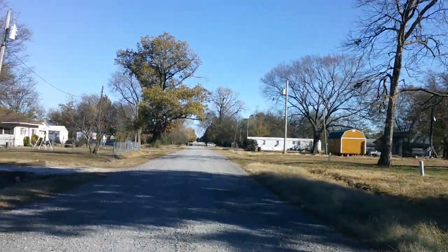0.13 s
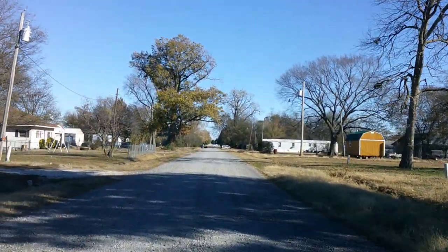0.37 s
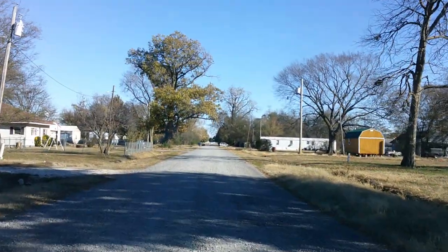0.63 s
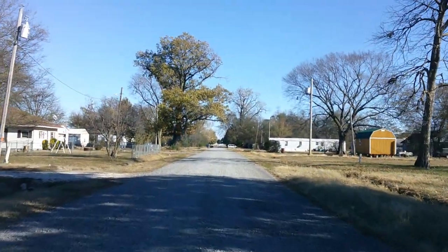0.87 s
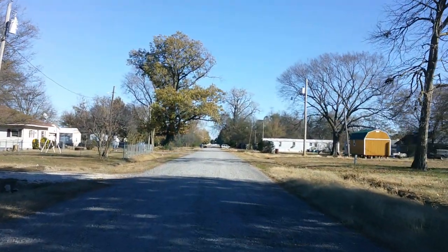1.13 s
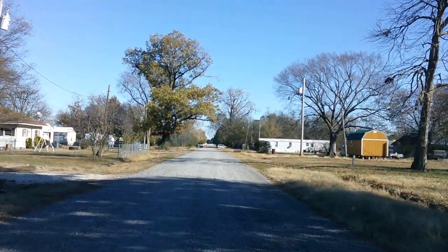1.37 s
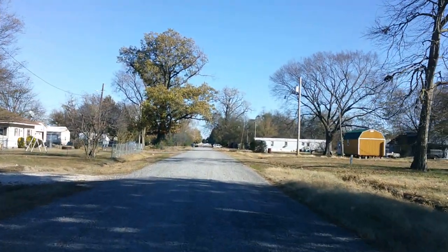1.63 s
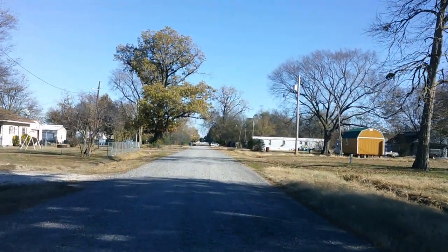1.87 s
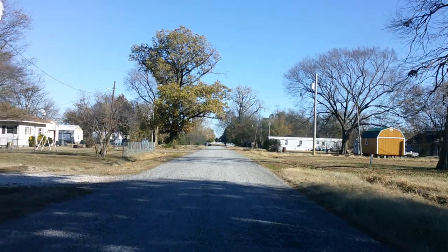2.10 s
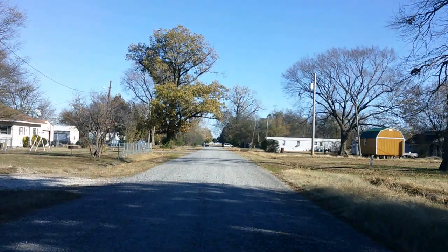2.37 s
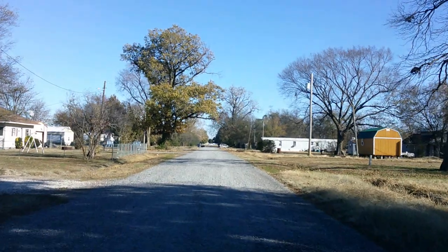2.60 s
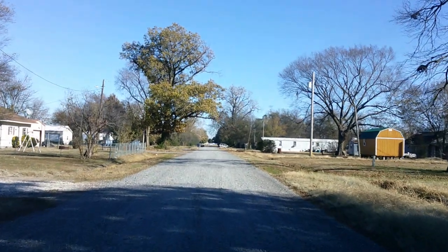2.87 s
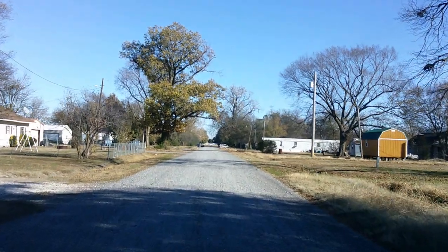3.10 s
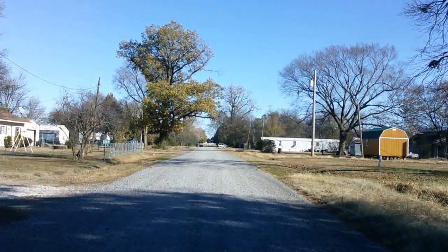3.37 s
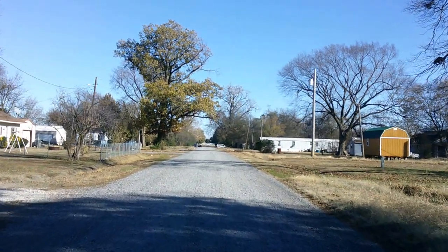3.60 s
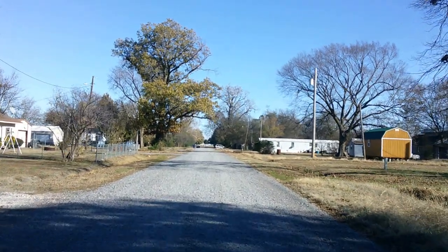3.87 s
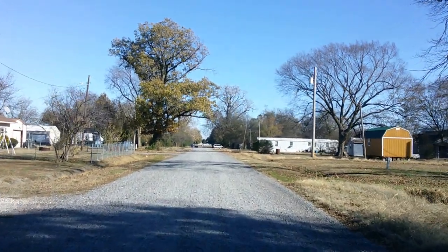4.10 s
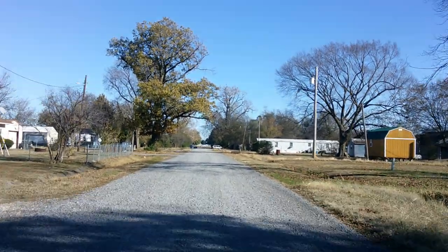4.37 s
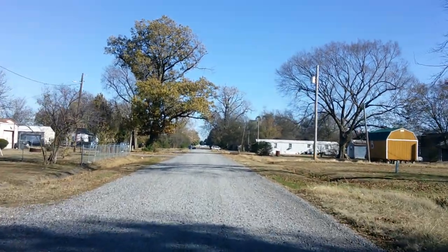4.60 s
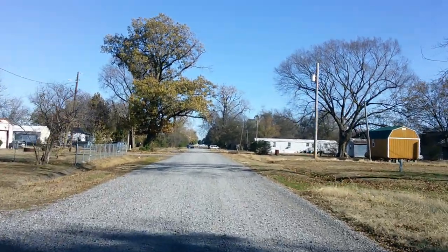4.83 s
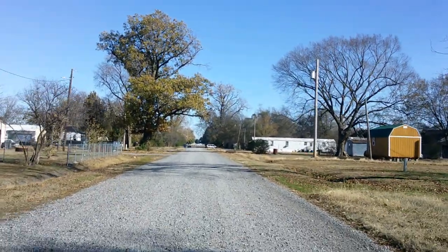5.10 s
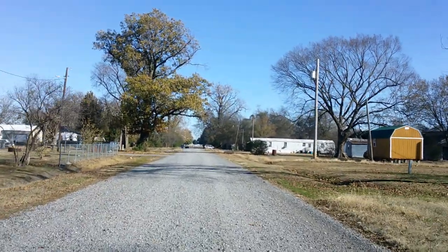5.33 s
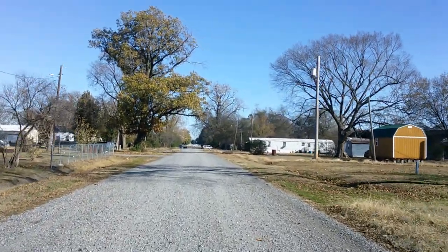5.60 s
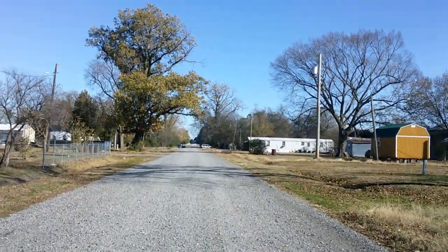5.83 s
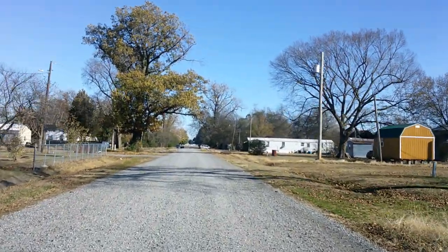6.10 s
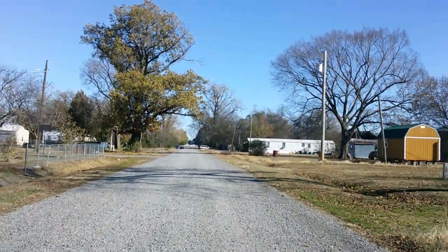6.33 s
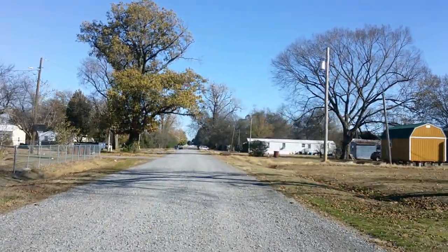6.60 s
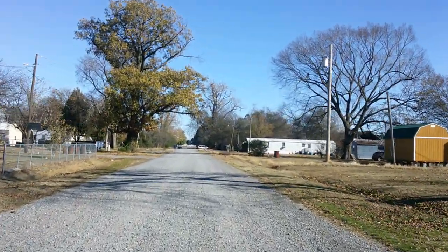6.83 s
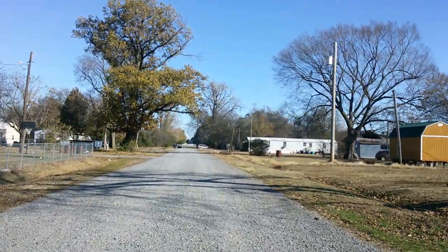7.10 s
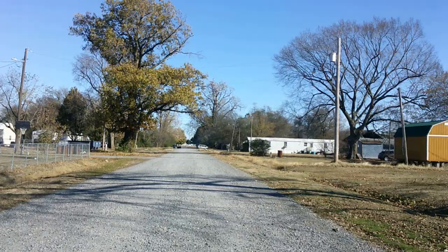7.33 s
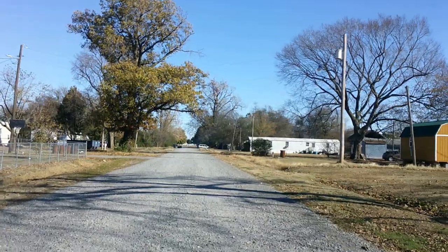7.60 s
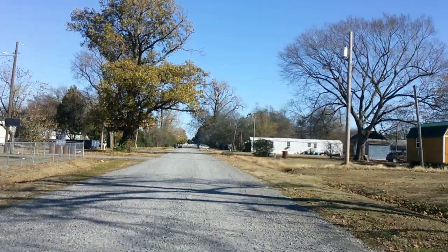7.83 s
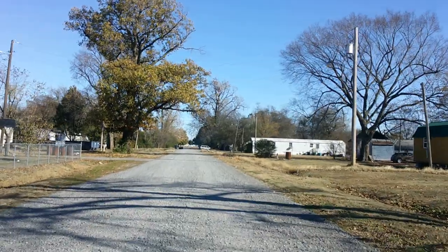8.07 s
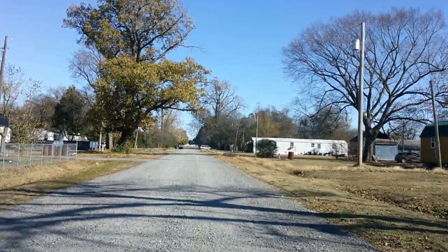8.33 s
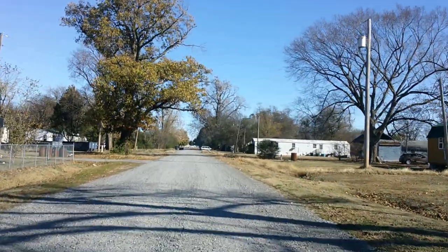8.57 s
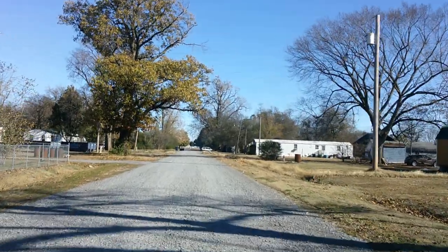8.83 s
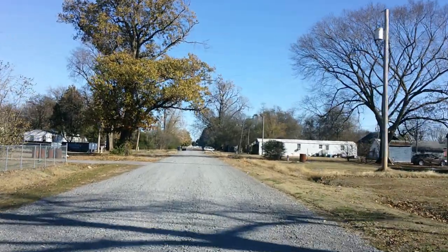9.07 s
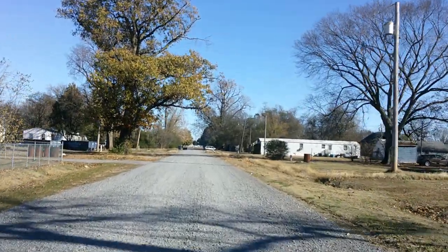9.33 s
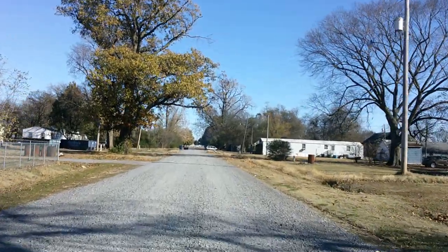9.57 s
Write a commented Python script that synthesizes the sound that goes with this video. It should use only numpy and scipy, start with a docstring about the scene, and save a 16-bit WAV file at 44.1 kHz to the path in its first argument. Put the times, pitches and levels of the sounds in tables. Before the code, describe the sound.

Car tyres roll slowly over gravel, heard close and enclosed from within the cabin by a small, bright-sounding microphone. Early cracks and pings of stones on sheet metal give way to a quiet roll, then another flurry of ticks. Low drumming swells with the speed, large stones thump the floor pan ever more often, grit sprays the wheel arches, and the sound ends abruptly near nine seconds.

```python
"""Inside a car that rolls, slowly gaining speed, along a gravel road, heard by a small camera microphone.
Random impacts through filters make the tyre roar, the crunch of grit and the drumming of the cabin;
filtered noise adds the body shake. Noise bursts through resonances make stones tick and grit spray on
the sheet metal; decaying sines make pings and the thuds of larger stones on the floor pan.
The microphone port rings in the treble; the sound is cut off near the end."""
import sys
import numpy as np
from scipy import signal
from scipy.io import wavfile

SR = 44100
rng = np.random.default_rng(int(sys.argv[2]) if len(sys.argv) > 2 else 0)


def wrap_up_sound(samples):
    """Save the sound to the file named by the first command line argument, as 16-bit audio."""
    columns = np.atleast_2d(samples).T
    # keep every value between -1 and 1, then stretch to whole-number steps
    tamed = np.clip(columns, -1, 1)
    steps = np.round(tamed * 32767).astype(np.int16)
    wavfile.write(sys.argv[1], SR, steps)


def gain_from_decibels(decibels):
    """Convert decibel values to linear amplitude factors."""
    exponent = np.asarray(decibels, float) / 20
    return 10 ** exponent


N = 427769
TIME_S = np.arange(N) / SR
CUT_S = 9.0365  # the sound has stopped here


def evened(x):
    """Scales to rms 1."""
    return x / np.sqrt(np.mean(x ** 2) + 1e-20)


def curve(points, at_s=TIME_S):
    """Level in dB, in straight lines between (start_s, level_db) points."""
    return np.interp(at_s, *np.transpose(points))


def colour(x, points):
    """Minimum-phase filter with the gain of the (pitch_hz, level_db) points."""
    hz, db = np.transpose(points)
    full_hz = abs(np.fft.fftfreq(16384, 1 / SR))
    gain_db = np.interp(np.log(full_hz + 1), np.log(hz + 1), db)
    log_gain = np.log(gain_from_decibels(np.maximum(gain_db, -100)))
    # the Hilbert transform gives the phase that makes the filter causal
    taps = np.fft.ifft(np.exp(np.conj(signal.hilbert(log_gain)))).real[:6000]
    return signal.oaconvolve(x, taps)[:len(x)]


def resonate(x, modes, order=1):
    """Sum of resonances; a higher order repeats each section for steeper flanks."""
    out = np.zeros(len(x))
    for hz, width_hz, db in modes:
        section = signal.tf2sos(*signal.iirpeak(hz, hz / width_hz, SR))
        out += gain_from_decibels(db) * signal.sosfilt(np.repeat(section, order, axis=0), x)
    return out


def stones(per_s, spread_db, bed):
    """Random impacts, most small and a few large, over a bed of countless tiny ones."""
    size = gain_from_decibels(spread_db * np.minimum(rng.exponential(1, N), 5))
    size = size * rng.choice([-1., 1.], N)
    hits = rng.random(N) < per_s / SR
    return evened(size * hits) + bed * rng.standard_normal(N)


def lumps(per_s, depth_db):
    """Gain that wanders as the stones come in clumps."""
    knots_s = np.arange(0, N / SR + 1, 1 / per_s)
    return gain_from_decibels(depth_db * np.interp(TIME_S, knots_s, rng.standard_normal(len(knots_s))))


# drumming that grows with speed and swells over rough patches: start_s, level_db
ROUGHNESS = [(0.0, -42.5), (0.5, -44), (1.12, -43.5), (1.36, -39), (1.6, -43), (2.56, -42.5), (2.78, -47),
             (3.0, -41.5), (4.25, -39), (4.48, -33.5), (4.7, -36.5), (5.6, -35), (6.07, -35.5),
             (6.58, -30.5), (6.95, -37.5), (7.4, -32.5), (7.68, -34.5), (7.88, -30.5), (8.13, -35),
             (8.7, -34.5), (8.87, -29.5), (8.95, -34)]


def drumming_db(at_s=TIME_S):
    """Level of the drumming, which sets how hard the road works the car."""
    return curve(ROUGHNESS, at_s)


def following_db(calm_level_db, db_per_db):
    """Level of a layer that follows the drumming up from the slow start."""
    calm_drumming_db = -44
    return calm_level_db + db_per_db * (drumming_db() - calm_drumming_db)


# spectrum of the body shake: pitch_hz, level_db
SHAKE_SPECTRUM = [(15, -31.5), (32, -17.5), (46, -3), (60, -3), (80, 0), (110, -18.5), (200, -86)]


def body_shake():
    """Deep noise of the shaking body, wandering slowly and growing with the drumming."""
    shake = colour(rng.standard_normal(N), SHAKE_SPECTRUM)
    shake = evened(shake * lumps(per_s=2.5, depth_db=0.5))
    return gain_from_decibels(following_db(calm_level_db=-58, db_per_db=0.63)) * shake


# spectrum of the tread hiss with the port resonance in it: pitch_hz, level_db (relative, per Hz)
HISS_SPECTRUM = [(2240, -32.5), (3800, -10.5), (4600, -18), (5140, -13), (5700, -7), (6560, -1.5),
                 (6940, 1), (7840, -8), (8810, -24.5), (11500, -57.5), (19400, -120)]
# level of the tread hiss: start_s, level_db
HISS_LEVEL = [(0, -72), (.22, -76), (.7, -75.5), (1.0, -72), (1.2, -76), (1.68, -73.5), (1.95, -74),
              (2.15, -78), (2.36, -78), (2.6, -74), (3.2, -72), (4.3, -72), (4.55, -74.5), (5.3, -71),
              (6.0, -76), (6.25, -75.5), (6.4, -71), (6.55, -73), (6.63, -70), (6.75, -74.5), (7.44, -72),
              (7.65, -75), (7.98, -70.5), (8.36, -75), (8.84, -73)]


def tread_hiss():
    """Fine grit under the tread: lumpy impacts filtered to the bright band of the port."""
    grit = stones(per_s=120, spread_db=2.5, bed=2)
    grit = grit * lumps(per_s=43, depth_db=1.5) * lumps(per_s=12, depth_db=1.3)
    return gain_from_decibels(curve(HISS_LEVEL)) * evened(colour(grit, HISS_SPECTRUM))


# spectrum of the even tyre roar: pitch_hz, level_db (relative, per Hz)
ROAR_SPECTRUM = [(700, -58), (1100, -14.5), (1500, -5), (2200, -2.5), (3400, -10.5), (4800, -21),
                 (6500, -50), (10600, -110)]
# the roar swells, then eases back: start_s, level_db
ROAR_SWELL = [(0, -69), (.4, -71.5), (3.0, -70.5), (3.6, -65.5), (4.3, -65.5), (6.1, -68), (7.6, -67.5),
              (9.0, -69.5)]


def tyre_roar(clumps):
    """Impacts so dense that they merge into an even mid-range roar."""
    impacts = stones(per_s=430, spread_db=3, bed=2.3) * clumps
    return gain_from_decibels(curve(ROAR_SWELL)) * evened(colour(impacts, ROAR_SPECTRUM))


# spectrum of grit heard through the floor: pitch_hz, level_db (relative, per Hz)
CRUNCH_SPECTRUM = [(260, -34), (450, 0), (549, -9), (630, -11), (717, -16), (815, -12), (1250, -20.5),
                   (1710, -29.5), (2500, -37.5), (4800, -59.5), (6240, -82.5), (10600, -120)]


def grit_crunch(clumps):
    """Clumped impacts heard through the floor, growing with the drumming."""
    grit = stones(per_s=250, spread_db=3.5, bed=1.65)
    grit = grit * clumps * lumps(per_s=14, depth_db=2.5)
    crunch = evened(colour(grit, CRUNCH_SPECTRUM))
    return gain_from_decibels(following_db(calm_level_db=-54.5, db_per_db=0.65)) * crunch


# spectrum of the panel drumming: pitch_hz, level_db (relative, per Hz)
DRUM_SPECTRUM = [(20, -46.5), (38, -28.5), (60, -16), (90, -6), (150, -2), (240, -4.5), (372, -7.5),
                 (470, -13.5), (540, -22), (700, -24), (900, -32), (1200, -42.5), (2000, -100)]
# booming modes of the cabin: pitch_hz, width_hz, level_db
CABIN_MODES = [(80, 14, -1.5), (119.4, 17, 5), (160, 6.1, -6.5), (203.5, 48, 1), (629, 40, 4.5),
               (781, 27, 2.5)]


def cabin_rumble():
    """Tyres climbing stones drum the panels, and the cabin modes boom along."""
    impacts = stones(per_s=400, spread_db=3.0, bed=1.23)
    impacts = impacts * lumps(per_s=30, depth_db=1.2) * lumps(per_s=9, depth_db=1.07)
    drum = colour(impacts, DRUM_SPECTRUM)
    return gain_from_decibels(drumming_db()) * evened(drum + resonate(drum, CABIN_MODES))


def road():
    """All the continuous layers; roar and crunch share the same clumps of stones."""
    clumps = lumps(per_s=40, depth_db=1.5)
    return body_shake() + tread_hiss() + tyre_roar(clumps) + grit_crunch(clumps) + cabin_rumble()


# resonances of the microphone port: pitch_hz, width_hz (of one section), level_db (relative)
PORT_MODES = [(6793, 790, 10), (6370, 1100, -1.5), (5720, 610, -12.5), (7570, 380, -17.5)]


def through_port(x):
    """The microphone port rings in the treble, as steep doubled resonances."""
    return resonate(x, PORT_MODES, order=2)


# handfuls of grit thrown against the wheel arch:
# start_s, length_s, bright_db, dull_db (drive levels before the resonances)
GRIT_SPRAYS = [(0.648, .008, -61, -59), (1.996, .016, -59, -58), (2.387, .012, -60, -56),
               (2.486, .014, -51, -64), (2.503, 0.011, -54.5, -62), (2.582, .010, -59, -60),
               (2.817, .008, -66, -61), (3.668, 0.011, -60, -59), (6.440, 0.016, -62.5, -56),
               (6.386, .022, -69, -60), (4.564, 0.01, -68, -62), (4.667, .016, -70, -64),
               (5.779, 0.022, -66, -62), (6.163, .016, -62, -63), (6.406, .010, -52.5, -60),
               (6.429, .008, -58, -64), (6.465, .008, -50, -57), (6.512, 0.0072, -57, -62),
               (7.838, .010, -58, -58), (7.9, .022, -65, -63), (7.927, .030, -66.5, -57.5),
               (8.077, 0.013, -67, -63), (8.09, 0.012, -63, -63), (8.606, .016, -62.5, -61)]
# resonances of the wheel arch: pitch_hz, width_hz (of one section), level_db (relative)
ARCH_MODES = [(4040, 550, -1.5), (3000, 650, 1), (2100, 1200, 1.5)]


def sprays():
    """A flat burst of many grains, too dense to tell apart, through port and wheel arch."""
    rise_s, tail_t60_s = .001, .015
    t = np.arange(2000) / SR
    drive = np.zeros((2, N + len(t)))  # bright, dull
    grains = rng.standard_normal((len(GRIT_SPRAYS), 2, len(t)))
    grains = grains * rng.exponential(1, (len(GRIT_SPRAYS), 1, len(t)))
    for (start_s, length_s, *levels_db), noise in zip(GRIT_SPRAYS, grains):
        tail = gain_from_decibels(-60 * np.maximum(t - length_s, 0) / tail_t60_s)
        burst = np.clip(t / rise_s, 0, 1) * tail
        start = round(start_s * SR)
        drive[:, start:start + len(t)] += gain_from_decibels(levels_db)[:, None] * noise * burst
    bright, dull = drive[:, :N]
    return gain_from_decibels(-1.5) * through_port(bright) + gain_from_decibels(1.5) * resonate(dull, ARCH_MODES, order=2)


# stones that ring one patch of the bodywork at its own pitch:
# start_s, level_db (before rise and doubling), pitch_hz, t60_s
BODY_PINGS = [(.8740, -27, 299, .04), (.2150, -34.5, 870, .02), (.2315, -43, 1170, 0.025),
              (.3305, -40, 1150, 0.017), (.3305, -43, 2190, .015), (.6290, -44, 900, 0.023),
              (.6490, -52, 1160, 0.021), (.8720, -49, 1240, 0.026), (1.0260, -50, 1270, 0.027),
              (1.0325, -27.5, 442, 0.038), (1.9945, -46, 1640, 0.017), (2.0270, -44, 1140, 0.02),
              (2.1430, -44, 850, 0.027), (2.4440, -56, 1300, 0.018), (2.8165, -48, 1500, .015),
              (3.4640, -47, 1360, 0.032), (3.5620, -47, 1330, 0.027), (3.6660, -51, 1240, .025),
              (4.4060, -49, 1220, 0.022), (5.4240, -36, 613, 0.043), (6.0110, -46, 714, .03),
              (6.3090, -53, 750, 0.025), (6.4545, -40, 950, .02), (6.4540, -37.5, 5600, .01),
              (6.4545, -38, 3260, 0.015), (6.4805, -47.5, 3450, .012), (7.2245, -40.5, 1400, 0.024),
              (7.4250, -40, 600, 0.043), (7.7520, -38.5, 620, 0.057), (7.8395, -51.5, 3560, .02),
              (7.9320, -68, 4330, 0.097), (8.7535, -47, 840, 0.026), (8.9770, -48, 750, .03)]


def pings():
    """A short ring of two neighbouring modes, the upper one weaker."""
    rise_s, partner_ratio, partner_db = 0.002, 1.27, -10  # rise is a time constant
    t = np.arange(5000) / SR
    out = np.zeros(N + len(t))
    for start_s, level_db, hz, t60_s in BODY_PINGS:
        pair = np.sin(2 * np.pi * hz * t)
        pair += gain_from_decibels(partner_db) * np.sin(2 * np.pi * partner_ratio * hz * t)
        envelope = gain_from_decibels(level_db - 60 * t / t60_s) * (1 - np.exp(-t / rise_s))
        start = round(start_s * SR)
        out[start:start + len(t)] += 2 * envelope * pair
    return out[:N]


def small_ticks():
    """Draws small stones at random moments, more often the harder the road drums."""
    count = 90
    level_db, spread_db = (-66, -68, -68), (2.2, 3.5, 3.5)  # drive of bright, ring, knock
    t = np.arange(0, CUT_S, .001)
    share = np.cumsum(gain_from_decibels(.8 * drumming_db(t)))
    start_s = np.interp(rng.random(count), share / share[-1], t)
    return np.column_stack([start_s, level_db + spread_db * rng.standard_normal((count, 3))])


# loud stones on the sheet metal:
# start_s, bright_db, ring_db, knock_db (drive levels before the resonances)
LOUD_TICKS = [(0.0047, -57.5, -55, -45.5), (0.0715, -61, -73.5, -58), (0.1179, -51, -50, -46),
              (0.2144, -49, -55.5, -44), (0.2235, -66, -55, -56.5), (0.2285, -56, -54, -54),
              (0.2307, -49.5, -41.5, -44), (0.33, -22, -32.5, -39.5), (0.4021, -59, -52, -53),
              (0.4102, -58, -66, -49), (0.4176, -59, -61, -50.5), (0.5812, -64.5, -59, -56),
              (0.6098, -62, -61.5, -52.5), (0.6285, -47, -51, -46), (0.648, -47, -42, -42),
              (0.8391, -43.5, -53, -48.5), (0.8531, -64, -67, -46), (1.0145, -51, -54, -51),
              (1.0344, -50, -74, -54), (1.0448, -53.5, -69, -50), (1.1251, -64, -54.5, -50.5),
              (1.458, -67, -72, -67), (1.599, -68, -75, -62), (1.816, -64, -72, -64),
              (1.8804, -59.5, -59, -64), (1.9545, -65, -66, -58), (1.9944, -43.5, -44, -50),
              (2.0073, -50, -54, -44), (2.0269, -52.5, -55, -39.5), (2.0384, -59.5, -55, -53),
              (2.0808, -60, -54, -49), (2.385, -52, -51, -49), (2.415, -58, -60, -57),
              (2.4214, -53, -62, -59), (2.4382, -54, -60, -47), (2.444, -41, -46, -47),
              (2.456, -56, -54, -60), (2.4636, -43.5, -43.5, -43), (2.4755, -42.5, -42.5, -49),
              (2.4889, -50, -57, -64), (2.5135, -39.5, -48, -42), (2.5725, -63, -70, -69),
              (2.5819, -53, -53, -45), (2.6546, -61.5, -49.5, -49), (2.6833, -55.5, -69, -59),
              (2.742, -66, -62, -60), (2.8174, -56, -57, -51), (2.9556, -64, -70, -67),
              (2.984, -64, -68, -62), (3.4638, -60, -57, -46), (3.5621, -57, -51, -45),
              (3.6659, -58, -50, -49), (3.818, -62, -53, -56), (4.1618, -57, -59, -52),
              (4.1933, -59, -62, -46), (4.2506, -60, -64, -46), (4.3424, -47.5, -68, -58),
              (4.357, -57, -72, -45), (4.408, -54, -59, -47.5), (4.4545, -48.5, -68, -50),
              (4.461, -60, -54, -46), (4.5006, -63, -63, -47), (4.567, -66, -53, -52.5),
              (4.669, -62, -60, -60), (4.676, -63, -62, -55), (4.7525, -61, -62, -52),
              (4.7575, -52.5, -62, -59), (4.8139, -60, -58, -53), (4.8215, -62, -58, -53),
              (4.8912, -48.5, -50, -47), (4.8989, -57, -58, -54), (4.959, -62, -62, -53),
              (5.2324, -60, -52, -48.5), (5.2963, -61, -61, -52), (5.3337, -67, -68, -58),
              (5.354, -60, -54, -52), (5.3935, -62, -65, -58.5), (5.4195, -64, -63, -63),
              (5.436, -62.5, -53, -61), (5.5061, -53, -54, -43.5), (5.6824, -66, -71, -62),
              (5.7865, -56, -63, -49.5), (5.845, -59.5, -69, -68), (5.911, -58, -55, -64),
              (5.9752, -57.5, -53, -55), (6.1621, -62, -61, -52), (6.2339, -58.5, -62, -65),
              (6.2898, -45, -56, -49), (6.3529, -64.5, -68, -64), (6.3883, -62.5, -60, -61),
              (6.4084, -45, -58, -43.5), (6.4272, -49, -74, -53.5), (6.4535, -34.5, -36.5, -38),
              (6.4641, -46, -40.5, -43), (6.472, -49, -62, -45), (6.4802, -49.5, -41, -53),
              (6.506, -50, -58, -44.5), (6.4965, -51.5, -59.5, -50.5), (6.5604, -58, -60, -53),
              (6.6696, -63, -59, -53), (6.7344, -50, -49.5, -61), (6.7874, -57.5, -53, -55),
              (6.8986, -55, -54, -56.5), (6.977, -60, -65, -63), (7.024, -51, -51, -44),
              (7.0407, -55.5, -63, -45), (7.159, -65, -58, -56), (7.2019, -61, -57, -49),
              (7.2262, -63, -72, -49), (7.2541, -51.5, -52, -47), (7.3157, -67, -68, -61),
              (7.4514, -54, -66.5, -47), (7.4946, -54, -74.5, -48), (7.5708, -61, -72, -59),
              (7.6049, -53.5, -66, -55), (7.8391, -48.5, -50, -48), (7.9289, -54, -56.5, -42),
              (7.9525, -55, -60, -51), (8.0256, -63, -63, -61), (8.0784, -61, -64, -52),
              (8.0975, -63, -63, -49), (8.238, -66, -61, -56), (8.2711, -54, -58, -55.5),
              (8.3151, -61, -66, -45), (8.3468, -60, -61.5, -58), (8.432, -61, -65, -50),
              (8.5184, -68.5, -64, -59), (8.5333, -56, -56, -62), (8.5848, -63.5, -63, -59),
              (8.6072, -59, -58, -59), (8.6151, -60, -60, -46.5), (8.7295, -66, -67, -64),
              (8.7543, -51, -58, -44), (9.0098, -61, -54, -57)]
# ring of the sheet metal: pitch_hz (middle patch), width_hz (of one section), level_db (relative)
PANEL_MODES = [(3417, 420, 2), (2650, 840, -2), (4550, 1100, -10)]
# dull knock: pitch_hz (middle patch), width_hz (of one section), level_db (relative)
KNOCK_MODES = [(684, 750, 4.5), (1070, 700, 6), (1430, 550, -5.5), (1980, 1500, -7.5)]


def ticks():
    """Each stone is a crack with a short rattling tail that drives port, panel and dull knock."""
    patches = 1 + .025 * np.array([-1, 0, 1])  # the pitch differs from patch to patch
    # rows: bright, ring, knock
    rise_s = np.array([[.0007], [.0012], [.0022]])  # the dull knock starts more softly
    scatter_t60_s = np.array([[.042], [.028], [.028]])
    scatter_share = np.array([[.27], [.3], [.32]])
    t = np.arange(4000) / SR
    blow = 1.1 * gain_from_decibels(-60 * t / 0.0048)
    scatter = scatter_share * gain_from_decibels(-60 * t / scatter_t60_s)  # tail in the cabin
    shape = (blow + scatter) * (1 - np.exp(-t / rise_s))
    first_contacts = 1.15 * np.hanning(22)[1:-1] * (np.arange(20) % 6 < 3)

    drive = np.zeros((len(patches), 3, N + len(t)))
    rows = np.vstack([LOUD_TICKS, small_ticks()])
    rattle = rng.standard_normal((len(rows), 3, len(t)))
    struck = rng.choice(len(patches), len(rows), p=[.25, .5, .25])
    for (start_s, *levels_db), noise, patch in zip(rows, rattle, struck):
        crack = noise * shape
        crack[0, :20] += first_contacts
        crack[1:, 4] += (3.0, 1.3)  # the blow itself rings the panel and the knock
        start = round(start_s * SR)
        drive[patch, :, start:start + len(t)] += gain_from_decibels(levels_db)[:, None] * crack

    bright = through_port(drive[:, 0, :N].sum(0))
    ring, knock = np.zeros(N), np.zeros(N)
    for patch_drive, ratio in zip(drive, patches):
        ring += resonate(patch_drive[1, :N], np.multiply(PANEL_MODES, (ratio, 1, 1)), order=2)
        knock += resonate(patch_drive[2, :N], np.multiply(KNOCK_MODES, (ratio, 1, 1)), order=2)
    return gain_from_decibels(9.5) * bright + gain_from_decibels(17.5) * ring + gain_from_decibels(17.0) * knock


# large stones on the floor pan: start_s (1 ms after the onset), level_db (before a 9 dB trim),
# boom_db (relative gain of the lowest mode), hardness_db_per_octave
FLOOR_THUDS = [(0.08, -29, -14.5, -1), (0.783, -30, -9, 7), (0.869, -19, -3.5, -2), (0.89, -23, 7, -0.5),
               (1.024, -30, -12, 9), (2.144, -49, -18, 6), (2.468, -30.5, -2, -1), (3.319, -35, -13, -16),
               (3.438, -24, -1, 2), (4.321, -28.5, 3, 3), (4.754, -27.5, 0.5, -6), (4.896, -29, -17, 4.5),
               (5.422, -26, -12, -2), (5.739, -28, 2, -2), (6.009, -32.5, -4.5, 2.5),
               (6.137, -40.5, -0.5, 12), (6.186, -40.5, -14.5, -4.5), (6.231, -28.5, 8.5, 0),
               (6.285, -33, 5.5, -8), (6.307, -43, -5.5, -1.5), (6.401, -31.5, -13.5, 7.5),
               (6.459, -30, -4, -7), (6.526, -29, -3, -6), (6.70, -33, 1.5, -6.5), (6.933, -29.5, -8, 8),
               (7.042, -24.5, -17, 4), (7.112, -26.5, -5, -5), (7.222, -26, -6.5, -3.5),
               (7.368, -39.5, 12, -8), (7.43, -20, -22, -2), (7.457, -22.5, -8.5, 1.5),
               (7.645, -28, -15, 3.5), (7.75, -25, 0, 3), (7.992, -31, -18, -4.5), (8.294, -27.5, -10, 5.5),
               (8.752, -38.5, -11, 4.5), (8.82, -27.5, -3, -12), (8.977, -28, 8.5, 1)]
# modes of the floor pan: pitch_hz (before detuning), level_db (relative), t60_s
PAN_MODES = [(227.6, 2, 0.4), (325.6, 5.5, 0.072), (371, 4.5, 0.069), (455.5, 1, .12), (551.5, -11.5, 0.17),
             (610.6, -3, 0.095), (792, -10.5, 0.061), (927, -15, 0.075), (1046, -16.5, 0.082)]


def thuds():
    """A soft blow rings the floor pan; harder stones reach upper modes, the lowest swells late and beats."""
    t = np.arange(20000) / SR
    out = np.zeros(N + len(t))
    detune = 1 + .025 * rng.standard_normal((len(FLOOR_THUDS), len(PAN_MODES)))
    detune[:, 0] = 1  # the whole pan swings at one pitch wherever it is struck
    hz, mode_db, t60_s = np.transpose(PAN_MODES)[:, :, None]
    beat = 1 + 0.31 * np.cos(2 * np.pi * 24 * t)
    late_swell = (1 - np.exp(-t / 0.022)) ** 2
    soft_start = 1 - np.exp(-t / 0.004)
    for (start_s, level_db, boom_db, hardness), factor in zip(FLOOR_THUDS, detune):
        decay = gain_from_decibels(mode_db + hardness * np.log2(hz / 450) - 60 * t / t60_s)
        modes = decay * np.sin(2 * np.pi * hz * factor[:, None] * t)
        boom = gain_from_decibels(boom_db) * modes[0] * beat * late_swell
        ring = boom + modes[1:].sum(0)
        start = round((start_s - .001) * SR)
        out[start:start + len(t)] += gain_from_decibels(level_db - 9.0) * ring * soft_start
    return out[:N]


def scene():
    """All sources meet at one microphone."""
    return (road() + sprays() + pings() + ticks() + thuds())[None]


def roll_off(x):
    """The treble ends steeply here."""
    return signal.sosfilt(signal.butter(12, 9040, fs=SR, output="sos"), x)


def record(dry):
    """Band limit of the microphone chain; the sound then stops within a few ms at the cut."""
    edge_hz, fade_s = 8900, 0.0037
    low_pass = signal.firwin(255, edge_hz, fs=SR)[None]
    limited = signal.oaconvolve(dry, low_pass, "same")
    mix = limited * np.clip((CUT_S - TIME_S) / fade_s, 0, 1)
    return roll_off(mix)


dry = scene()
out = record(dry)
wrap_up_sound(out)
```